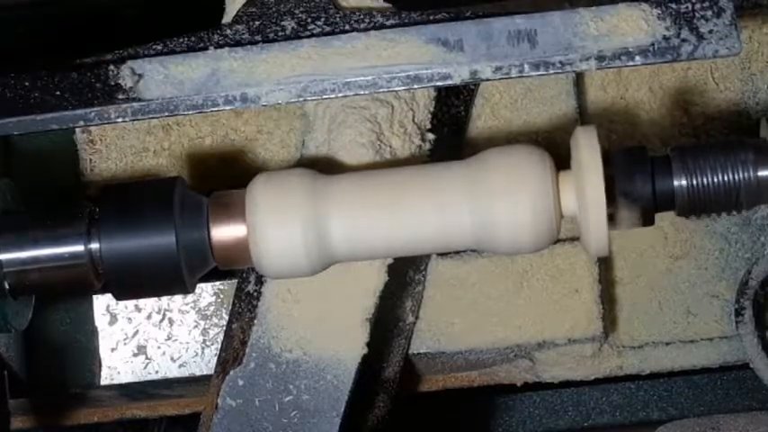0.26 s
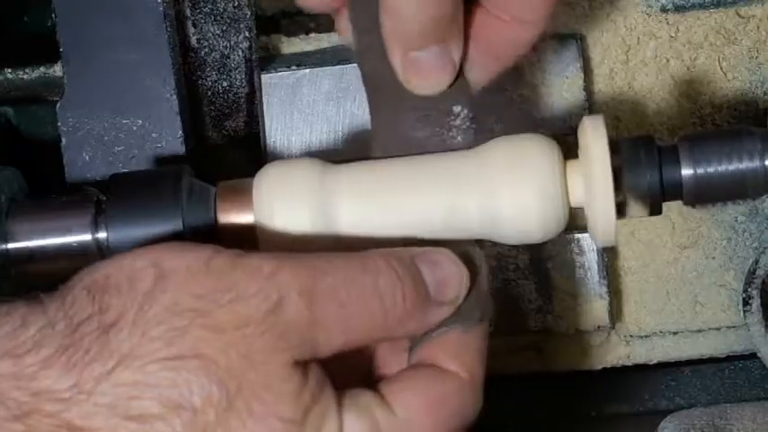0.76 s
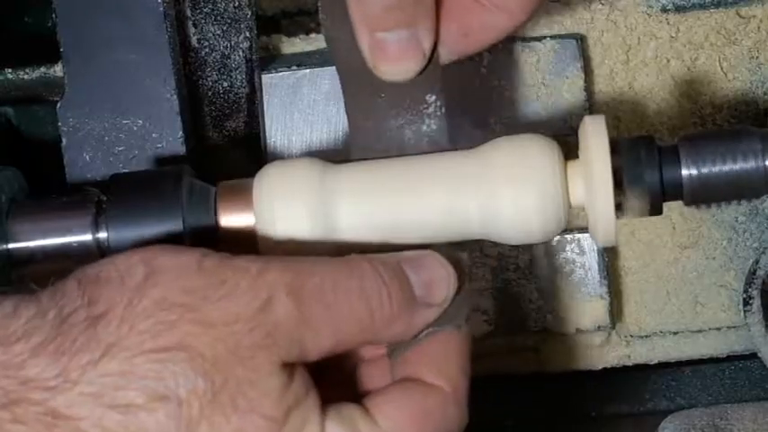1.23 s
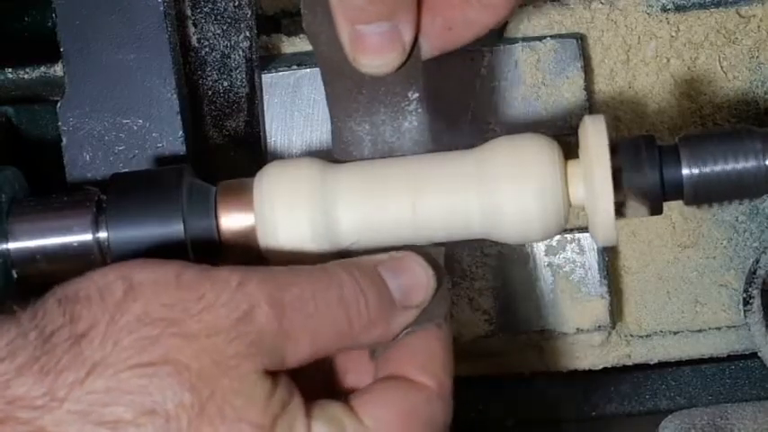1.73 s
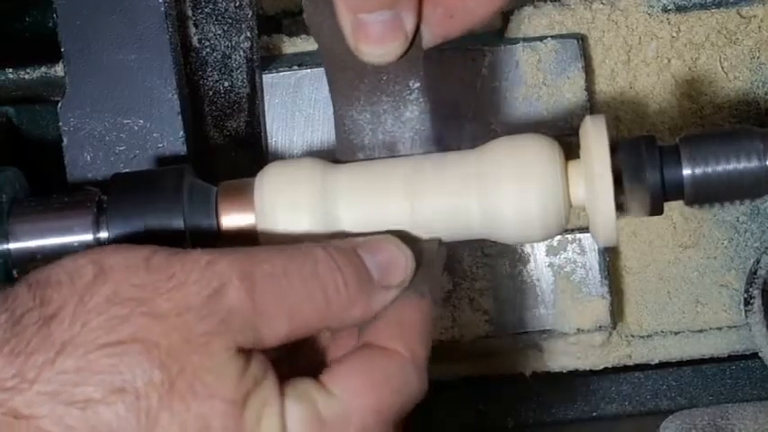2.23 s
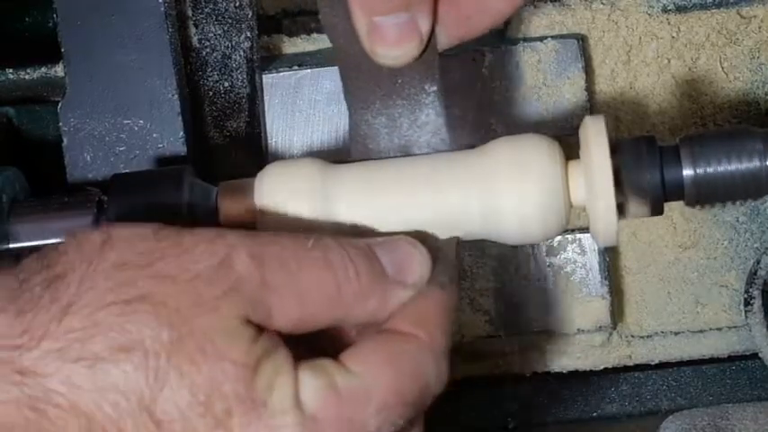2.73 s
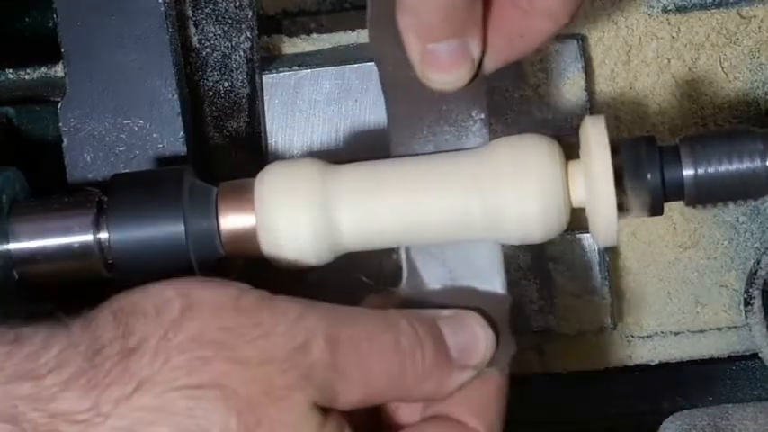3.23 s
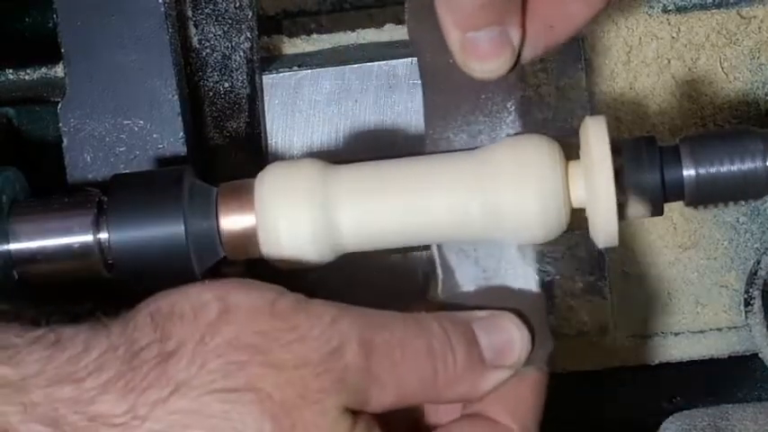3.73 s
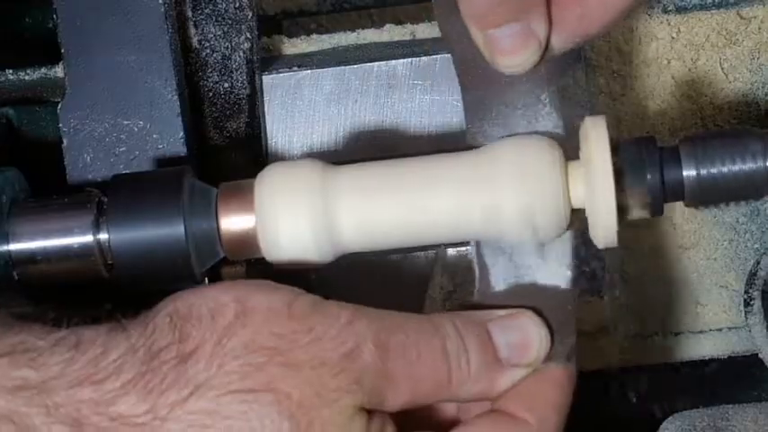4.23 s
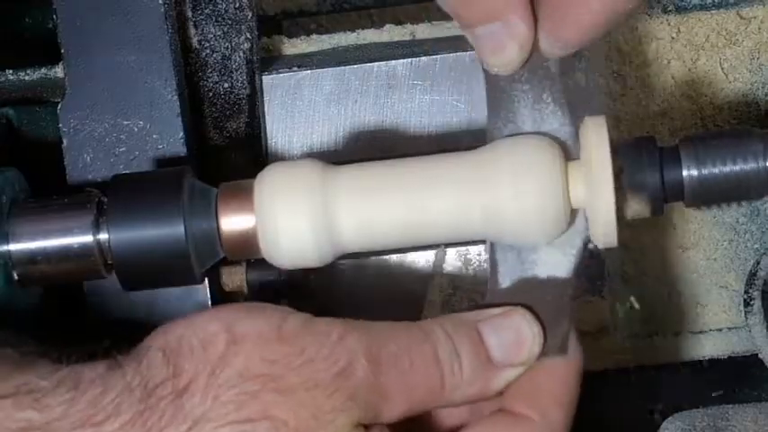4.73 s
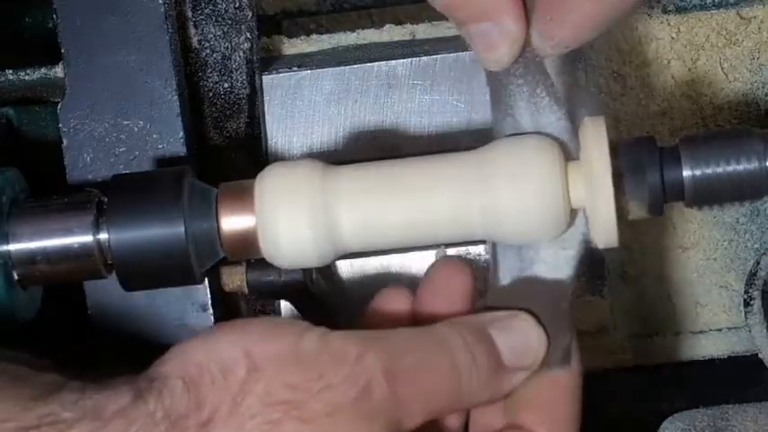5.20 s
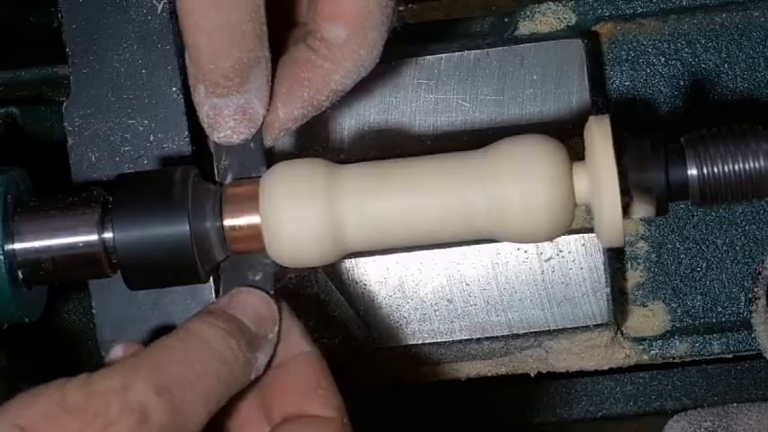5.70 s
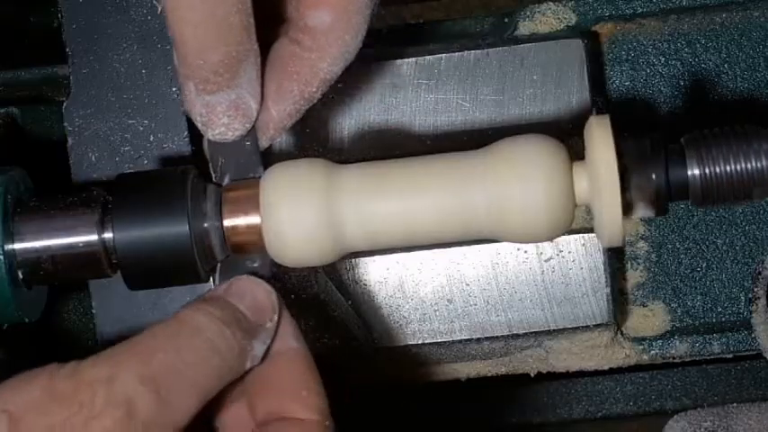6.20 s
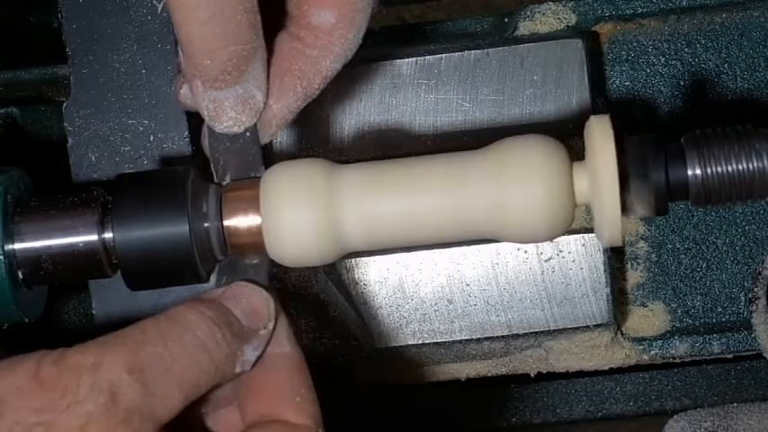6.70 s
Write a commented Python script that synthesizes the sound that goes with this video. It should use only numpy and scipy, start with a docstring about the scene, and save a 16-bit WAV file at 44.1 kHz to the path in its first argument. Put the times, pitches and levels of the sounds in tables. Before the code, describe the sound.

Very close in a workshop, a tool takes a faint, thin, ringing shaving for under half a second. A hard cut brings loud, bright sandpaper hiss on a spinning blank, firm and scrapy at first, then steadier. The small lathe hums and its bearings tick and chatter underneath. The strip rasps harsher over the shoulder, lifts off, and another cut leaves a finer strip: a short bite, then soft hiss.

```python
"""Sandpaper hisses on a blank turning in a small wood lathe close to the microphone, then rasps over its shoulder.
Three stages with hard cuts: a tool takes a faint, ringing shaving; a strip sands; a finer strip polishes the end.
Strips and tool are coloured noise with resonances, made uneven by slow random gains.
Under both sanding stages the drive drones (tones, bed noise, rumble) and the bearings chatter in bursts."""
import sys
import numpy as np
from scipy import signal
from scipy.fft import rfft, irfft, next_fast_len
from scipy.io import wavfile
from scipy.ndimage import uniform_filter1d, map_coordinates

SR = 44100
rng = np.random.default_rng(int(sys.argv[2]) if len(sys.argv) > 2 else 0)


def generate_wav(sig):
    """Save sig (samples, or channels by samples) to the path in sys.argv[1] as 16-bit PCM at SR."""
    pcm = np.round(np.clip(np.atleast_2d(sig).T, -1, 1) * 32767).astype(np.int16)
    wavfile.write(sys.argv[1], SR, pcm)


N = 306495

SANDING_START_S, POLISH_START_S = 0.4525, 5.4125
SPINDLE_HZ, MOTOR_HZ, MAINS_BUZZ_HZ = 26.27, 25.0, 100.0
TOP_HZ = 15800

# Mode tables: width = half-width at -6 dB. Colour and mode levels are relative unless noted.
# Strip pressure as rubbing level: t/s, level/dB
PRESSURE_DB = [(0.48, -10.5), (0.85, -11), (1.27, -12.5), (2.52, -12), (2.93, -15), (3.1, -13.5),
               (3.5, -12.5), (4.55, -13.5), (5.12, -13.5), (5.24, -16), (5.31, -19.5)]
HISS_DB = 0.4  # re pressure
# Coarser scrape: t/s, level re pressure/dB
SCRAPE_DB = [(1.1, -13), (2.05, -13.5), (2.25, -26), (2.65, -26), (2.9, -14), (3.6, -11), (4.5, -17),
             (5.05, -14), (5.2, -6), (5.32, -8)]
# Harder scrape at first, until the grip eases
FIRM_DB, FIRM_END_S, FIRM_RELEASE_S = -10, 1.02, 0.12
# Strip on the blank's shoulder: swelling rasp, weaker hiss
SHOULDER_START_S, SHOULDER_ATTACK_S, SHOULDER_END_S, SHOULDER_RELEASE_S = 4.55, 0.052, 5.3, 0.25
SHOULDER_DB, SHOULDER_SWELL_DB_PER_S, SHOULDER_HISS_DB = -15.5, 7, -3
SHOULDER_UNEVEN_DB = 0.9  # the rasp catches and eases
# Lift-off; only the edge still grazes
LIFT_S, LIFT_RELEASE_S, GRAZE_DB = 5.333, 0.022, -35
# Strip on the blank, hiss colour: f/Hz, level/dB
HISS_COLOUR = [(1200, -19.5), (2500, -17), (3700, -12.5), (4500, -9.5), (6000, -7.5), (8500, -4),
               (12000, 0.5), (15600, 2)]
# Scrape colour: f/Hz, level/dB
SCRAPE_COLOUR = [(1000, -13), (2400, -13), (3700, -13), (6000, -4), (7600, 4), (10500, 6.5), (12000, -17),
                 (15600, -34)]
# Paper resonances in the scrape: f/Hz, width/Hz, level/dB
SCRAPE_MODES = [(3200, 175, 0.5), (3990, 210, 0.5), (4970, 150, -5), (7400, 340, 0)]
# Shoulder rasp colour: f/Hz, level/dB
SHOULDER_COLOUR = [(1000, -21), (2700, -16), (3750, -11), (4200, -6), (4900, -6.5), (5500, -4.5),
                   (7000, -3.5), (9400, -4.5), (11000, -4.5), (15600, -14)]
# Paper resonances on the shoulder: f/Hz, width/Hz, level/dB
SHOULDER_MODES = [(3330, 230, -4.5), (4120, 160, 1.5), (4480, 190, 1), (5230, 160, 0), (5650, 230, 2),
                  (6440, 220, 0.5), (7050, 150, 1.5), (7740, 230, -1), (8240, 280, -1), (8850, 160, -7),
                  (10150, 170, 2), (11450, 200, -4), (12700, 250, -4)]
# Low flutter near the microphone while the strip rubs: f/Hz, level/dB
FLUTTER_COLOUR = [(15, 5), (50, -3), (100, -1), (170, -8), (300, 4), (1000, -43)]
# Hiss flicker: f/Hz, share of full depth
PATCHINESS = [(2000, 0.36), (2800, 0.74), (3800, 1), (5500, 0.77), (7000, 0.45), (9000, 0.34),
              (15000, 0.14)]

# Finer strip's pressure as hiss level: t/s, level/dB
POLISH_PRESSURE_DB = [(5.42, -20.5), (5.5, -24), (5.6, -22.5), (5.75, -21), (6.22, -22.5), (6.47, -21),
                      (6.62, -23), (6.94, -23)]
# Its treble, brighter towards the end: t/s, level/dB
POLISH_TREBLE_DB = [(6.3, -45), (6.48, -24), (6.62, -29), (6.88, -23), (6.95, -27)]
# Its grit bites, holds briefly, dies away
BITE_START_S, BITE_ATTACK_S, BITE_HOLD_S, BITE_DB, BITE_FADE_DB_PER_S = 5.515, 0.02, 0.17, -16.5, 90
BITE_TOUCH = 0.31  # share of the bite at first touch
# Finer strip on the collar, hiss colour: f/Hz, level/dB
POLISH_COLOUR = [(1200, -21), (2500, 1.5), (4500, 3.5), (6800, 2.5), (9500, 1), (11500, 3.5), (13300, 4.5),
                 (15600, 3)]
# Its paper resonances: f/Hz, width/Hz, level/dB
POLISH_MODES = [(2020, 120, 10.5), (4370, 370, -0.5), (6030, 200, 2.5), (7460, 110, 6), (7900, 110, 6),
                (8540, 300, 6), (10400, 300, 0)]
# Bite colour: f/Hz, level/dB
BITE_COLOUR = [(1500, -25), (3700, -9), (5000, -4), (7000, -3.5), (9000, -2), (11500, -1), (13500, -5),
               (15600, -11)]
# Paper resonances in the bite: f/Hz, width/Hz, level/dB
BITE_MODES = [(5450, 250, -5), (8200, 200, -11), (8970, 200, 1), (9380, 240, 4), (10600, 250, -3),
              (12700, 200, -6)]
# Taut strip rings: start t/s, length/s, f/Hz, width/Hz, level at full gain/dB
PAPER_RINGS = [(0.428, 0.3, 3130, 180, -33), (0.46, 0.17, 3950, 160, -31), (0.437, 0.25, 4650, 300, -32),
               (0.47, 0.08, 6550, 250, -17), (0.78, 0.22, 4030, 260, -32), (1.15, 0.95, 4720, 220, -37),
               (2.02, 0.32, 4820, 250, -28), (2.22, 0.43, 5600, 260, -28), (2.35, 0.36, 4800, 220, -32),
               (6.47, 0.16, 3300, 220, -31.5), (6.622, 0.12, 4400, 400, -34)]

SHAVING_DB = -31
# Tool's cut: f/Hz, level/dB
SHAVING_COLOUR = [(15, -48), (25, -19), (113, -18.5), (1710, -20), (2310, -20), (5170, -13), (5920, -18),
                  (6590, -14.5), (7540, -17), (8170, -12.5), (9100, -6.5), (11300, -15), (15600, -23)]
# Thin rings of the tool: f/Hz, width/Hz, level re plain cut/dB
TOOL_MODES = [(1750, 25, 6), (3520, 130, -2), (4180, 200, 2), (4660, 50, 0), (5340, 45, 4), (6670, 55, 9),
              (7960, 55, 11), (8520, 70, 8), (8790, 70, 5), (9100, 80, 6), (10040, 90, 4), (10350, 130, 3),
              (10590, 70, 7), (11180, 40, 3), (12300, 200, 2), (15340, 70, 14)]

# Running lathe: bed noise and chatter levels at t = 0, rising steadily
CHATTER_DB, CHATTER_RISE_DB_PER_S = -32, 0.69
BED_DB, BED_RISE_DB_PER_S = -30, 0.74
RUMBLE_DB = -29.5
# Bearing chatter bursts: start t/s, peak level before the burst offset/dB
CHATTER_BURSTS = [(0.4754, -12.5), (0.9278, -14.5), (1.4052, -14), (2.0547, -12), (2.585, -12.5),
                  (3.1951, -17), (3.2365, -16), (3.5189, -15), (3.6246, -16), (4.364, -6), (4.3794, -17),
                  (4.7391, -19), (4.974, -20), (5.0139, -16), (5.286, -12), (5.485, -15.5), (5.6236, -10),
                  (5.775, -15), (5.8132, -18), (6.033, -13), (6.173, -15), (6.2147, -18), (6.3137, -15),
                  (6.6832, -18), (6.8527, -15)]
# Bearing housing resonances: f/Hz, width/Hz, level/dB
HOUSING_MODES = [(1150, 22, -7.5), (1300, 14, -7.5), (1438, 25, -6), (1541, 30, -3.5), (1574, 15, -1.5),
                 (1645, 16, 2), (1690, 44, -8.5), (1830, 55, -5), (1946, 50, 3), (2017, 110, -1.5),
                 (2380, 160, -9), (2660, 45, -7.5), (3090, 40, -8)]
# Motor, belt and spindle tones: f/Hz, rms level/dB
DRIVE_TONES = [(64.9, -54), (121.8, -58), (124.8, -59), (129.9, -58), (173.9, -53), (200.2, -49.5),
               (224.8, -56), (239.6, -55), (249.3, -52), (274.5, -55), (296.1, -40), (315.4, -30.8),
               (326, -42), (328, -42), (337.1, -35), (358.7, -41.5), (394, -45), (519.2, -48), (662.1, -55),
               (840.5, -49), (979.8, -51), (990.5, -49), (1641.6, -44)]
WHINE_HZ = 740.2
# Motor overtone, swelling and sinking: t/s, rms level/dB
WHINE_DB = [(1.3, -47), (1.85, -35.5), (2.0, -47), (3.7, -41), (4.7, -45), (5.5, -36), (5.7, -42.5),
            (6.9, -37.5)]
# Bed and headstock resonances: f/Hz, width/Hz, level/dB
BED_MODES = [(310, 5, -2.5), (326.7, 5.4, 3.5), (343.3, 11, 4), (353, 6.3, -3), (378, 5.6, -2),
             (394, 14.2, -1.5), (419, 20, -9.5), (458.5, 13, -6), (520.4, 7, -7), (580.5, 16, -7),
             (761, 20, -8), (790, 20, -8.5), (855, 24, -8.5), (986, 18.6, -8)]
# Broad machine rumble: f/Hz, level/dB
RUMBLE_COLOUR = [(20, -21), (45, -26), (70, -7), (100, -10.5), (170, -0.5), (260, 6.5), (500, -0.5),
                 (700, 1.5), (1200, 1.5), (2250, 2.5), (2600, 3), (3000, -0.5), (4000, -4.5), (7000, -12),
                 (15000, -36)]

# Stereo width, applied to all side sound: f/Hz, side gain/dB
WIDTH = [(30, 3), (65, -8), (130, -7.5), (320, -10), (550, -5), (1000, -6), (1800, -5.5), (2400, -2),
         (3000, -8), (3800, -7.5), (5500, -8), (8000, -8.5), (13000, -5.5)]
# Stereo lean: f/Hz, left minus right gain/dB
LEAN = [(60, 1), (110, 5.5), (200, 0.5), (380, 1.5), (700, 0.5), (1290, 2), (2380, -0.5), (4400, -0.5),
        (8120, 0.5), (15000, 3)]

TIME = np.arange(N) / SR
FFT_SIZE = next_fast_len(N, True)
FREQS = np.maximum(np.fft.rfftfreq(FFT_SIZE, 1 / SR), 1)


def sanding(flutter_db=-51, shoulder_flutter_db=-2):
    """The strip scrapes firmly, hisses along the blank, then rasps over its shoulder and lifts off."""
    pressure = amp(curve(PRESSURE_DB)) * release(LIFT_S, LIFT_RELEASE_S)
    on_shoulder = attack(SHOULDER_START_S, SHOULDER_ATTACK_S)
    hiss = pressure * amp(HISS_DB + SHOULDER_HISS_DB * on_shoulder)
    firm = amp(FIRM_DB) * release(FIRM_END_S, FIRM_RELEASE_S)
    scrape = pressure * (amp(curve(SCRAPE_DB)) + firm)

    swell_db = SHOULDER_SWELL_DB_PER_S * (TIME - SHOULDER_START_S)
    dig = amp(SHOULDER_DB + swell_db + SHOULDER_UNEVEN_DB * walk(16))
    rasp = on_shoulder * (dig * release(SHOULDER_END_S, SHOULDER_RELEASE_S) + amp(GRAZE_DB))

    along = hiss * rub(HISS_COLOUR) + scrape * rub(SCRAPE_COLOUR, SCRAPE_MODES, drift=.012)
    along = patchy(along, depth_db=3.6, rate_hz=26, width_hz=110)
    over = rasp * rub(SHOULDER_COLOUR, SHOULDER_MODES)
    over = patchy(over, depth_db=1.5, rate_hz=26, width_hz=170)

    effort = unit(hiss + amp(shoulder_flutter_db) * rasp)
    flutter = amp(flutter_db) * effort * unit(filtered(noise(), colour(FLUTTER_COLOUR)))
    return along + leftward(over, share=.15) + flutter


def polishing(side_db=4.0):
    """The finer strip touches, bites, then settles to a soft, wide hiss."""
    fading_s = np.maximum(TIME - BITE_START_S - BITE_HOLD_S, 0)
    grip = BITE_TOUCH + (1 - BITE_TOUCH) * attack(BITE_START_S, BITE_ATTACK_S)
    bite = grip * amp(BITE_DB - BITE_FADE_DB_PER_S * fading_s)
    hiss = amp(curve(POLISH_PRESSURE_DB))
    paper = hiss * rub(POLISH_COLOUR, POLISH_MODES, grain_db=1.0, runout_db=0.66)
    paper = paper + bite * rub(BITE_COLOUR, BITE_MODES)
    paper = paper + amp(curve(POLISH_TREBLE_DB)) * rub(HISS_COLOUR, runout_db=1.0)
    return spread(patchy(paper, depth_db=2.1, rate_hz=22, width_hz=150), side_db)


def rub(points, modes=(), grain_db=0.56, runout_db=0.3, flicker_db=0.5, shift_db=1.3, drift=0.003):
    """Countless grits scratch the wood, harder once a turn; paper resonances drift, come and go with the grip."""
    contact_db = grain_db * walk(2500) + flicker_db * walk(25.06)
    contact_db = contact_db + runout_db * once_a_cycle(SPINDLE_HZ, 5.6)
    scratch = filtered(noise(), colour(points) * (FREQS < TOP_HZ))
    if len(modes):
        ringing = wander(filtered(noise(), resonances(modes)), drift, rate_hz=7)
        scratch = scratch + ringing * amp(shift_db * walk(8))
    return unit(scratch) * amp(contact_db)


def paper_rings(edge_s=0.058):
    """Pulled taut, the strip rings for a moment at a pitch set by its free length: narrow noise bands."""
    total = 0
    for start_s, length_s, hz, width_hz, db in PAPER_RINGS:
        gain = amp(db) * attack(start_s, edge_s) * release(start_s + length_s, edge_s)
        total = total + gain * unit(filtered(noise(), resonances([(hz, width_hz, 0)])))
    return total


def shaving():
    """The tool peels fine dust off the blank, and the steel rings thinly."""
    cut = noise() * amp(1.3 * walk(62.3))
    response = colour(SHAVING_COLOUR) * np.hypot(1, resonances(TOOL_MODES))
    return amp(SHAVING_DB) * unit(filtered(cut, response))


def bearings(uneven_db=1.8, turn_db=1.5, buzz_db=1.4, burst_offset_db=-7, burst_s=0.0025, side_db=-10):
    """Bearing play chatters with motor turn and torque ripple, at times in hard bursts, ringing the housing."""
    force_db = uneven_db * walk(180)
    force_db = force_db + turn_db * once_a_cycle(MOTOR_HZ, 2.2)
    force_db = force_db + buzz_db * once_a_cycle(MAINS_BUZZ_HZ, 0.92)
    force = unit(amp(force_db)) * amp(CHATTER_DB + CHATTER_RISE_DB_PER_S * TIME)
    for start_s, db in CHATTER_BURSTS:
        age = np.clip((TIME - start_s) / burst_s, 0, 20)
        force = force + amp(db + burst_offset_db) * age * np.exp(1 - age)  # peaks at age 1
    return spread(filtered(noise() * force, unit(resonances(HOUSING_MODES))), side_db)


def drive(waver=0.000584, flutter_db=0.7, side_db=-12):
    """Rotating parts hum at a slightly wavering speed; rolling noise rings the bed and rumbles round the room."""
    turning_s = TIME + np.cumsum(waver * walk(3.02)) / SR
    tones = amp(curve(WHINE_DB)) * np.exp(2j * np.pi * WHINE_HZ * turning_s)
    for hz, db in DRIVE_TONES:
        cycles = hz * turning_s + rng.random()
        tones = tones + amp(db + flutter_db * walk(6)) * np.exp(2j * np.pi * cycles)
    # sides a quarter cycle late; sqrt(2) turns rms into peak
    tones = np.sqrt(2) * np.array([tones.real, tones.imag])
    bed = unit(filtered(noise(), resonances(BED_MODES)))
    rumble = unit(filtered(noise() * amp(0.98 * walk(120)), colour(RUMBLE_COLOUR)))
    drone = tones + amp(BED_DB + BED_RISE_DB_PER_S * TIME) * bed
    return spread(drone, side_db) + amp(RUMBLE_DB) * rumble


def scatter(sound, echo_db=-19, decay_s=0.015):
    """Bed, headstock and hands return a cluster of early echoes that ripples the hiss."""
    lag_s = TIME[:SR // 40]
    echoes = rng.standard_normal((2, len(lag_s))) * np.exp(-lag_s / decay_s) * (lag_s > .0008)
    echoes = amp(echo_db) * echoes / np.linalg.norm(echoes, axis=1, keepdims=True)
    returned = signal.fftconvolve(sound, echoes, axes=1)[:, :N]
    return (sound + returned) / np.hypot(1, amp(echo_db))


def spread(sound, side_db):
    """Set the side share: low for direct machine sound, high for scattered sound."""
    return sound * np.array([[1], [amp(side_db)]])


def leftward(sound, share):
    """A source left of centre puts some of its front sound into the side."""
    return np.array([sound[0], sound[1] + share * sound[0]])


def microphone(sound):
    """Front plus/minus side gives left/right, with frequency-dependent width and lean."""
    mid, side = sound[0], filtered(sound[1], colour(WIDTH))
    lean = np.sqrt(colour(LEAN))
    return np.array([filtered(mid + side, lean), filtered(mid - side, 1 / lean)])


def patchy(x, depth_db, rate_hz, width_hz):
    """Roughen a hiss: narrow bands swell and sink on their own, rate_hz times a second."""
    hz, t_s, frames = signal.stft(x, SR, nperseg=512)
    chance = rng.standard_normal((256, 512))
    place = np.meshgrid(hz / width_hz, t_s * rate_hz, indexing="ij")
    field = unit(map_coordinates(chance, place, order=1, mode="mirror"))
    share = np.interp(hz, *np.transpose(PATCHINESS))[:, None]
    gain = amp(depth_db * share * field)
    gain = gain / np.sqrt(np.mean(gain ** 2, axis=1, keepdims=True))
    return signal.istft(frames * gain, SR)[1][..., :N]


def wander(x, share, rate_hz):
    """Let all resonances drift together by an rms share of their pitch, via a varying read position."""
    place = np.arange(N) + np.cumsum(share * walk(rate_hz))
    return np.array([map_coordinates(channel, [place], order=3, mode="mirror") for channel in x])


def noise():
    """Two unrelated white noises: front and sides."""
    return rng.standard_normal((2, N))


def walk(rate_hz):
    """Slow chance, rms 1: random levels held 1 / rate_hz and smoothed twice."""
    hold = int(SR / rate_hz)
    steps = np.repeat(rng.standard_normal(N // hold + 1), hold)
    return unit(uniform_filter1d(uniform_filter1d(steps, hold), hold)[:N])


def once_a_cycle(hz, sharpness):
    """A bump each cycle, mean 0, rms 1."""
    bump = np.exp(sharpness * np.cos(2 * np.pi * hz * TIME))
    return unit(bump - bump.mean())


def colour(points):
    """Gain at every frequency from (f/Hz, level/dB), linear in dB over log frequency."""
    hz, db = np.transpose(points)
    return amp(np.interp(np.log(FREQS), np.log(hz), db))


def resonances(modes):
    """Gain of steep-skirted modes (f/Hz, width/Hz, level/dB), powers added."""
    power = 0
    for hz, width_hz, db in modes:
        power = power + (amp(db) / (1 + ((FREQS - hz) / width_hz) ** 2)) ** 2
    return np.sqrt(power)


def filtered(x, gain):
    """Apply a frequency response."""
    return irfft(rfft(x, FFT_SIZE) * gain, FFT_SIZE)[..., :N]


def amp(db):
    """Decibels to gain."""
    return 10 ** (np.asarray(db) / 20)


def unit(x):
    """Scale to rms 1."""
    return x / np.sqrt(np.mean(x ** 2))


def curve(rows):
    """Interpolate (t/s, value) at every sample."""
    return np.interp(TIME, *np.transpose(rows))


def attack(start_s, length_s):
    """Gain rising 0 to 1 from start_s."""
    return np.clip((TIME - start_s) / length_s, 0, 1)


def release(end_s, length_s):
    """Gain falling 1 to 0, ending at end_s."""
    return np.clip((end_s - TIME) / length_s, 0, 1)


def stage(start_s, end_s):
    """1 inside a stage, 0 outside, edges smoothed over 24 samples."""
    return uniform_filter1d(1. * ((TIME >= start_s) & (TIME < end_s)), size=24)


def scene():
    """Shaving, sanding and polishing in turn; the last is further to the left."""
    lathe = drive() + bearings()
    rings = paper_rings()
    coarse = lathe + leftward(scatter(sanding() + rings), share=.03)
    fine = leftward(lathe, share=.08) + leftward(scatter(polishing() + rings), share=0.3)
    sound = shaving() * stage(0, SANDING_START_S)
    sound = sound + coarse * stage(SANDING_START_S, POLISH_START_S)
    sound = sound + fine * stage(POLISH_START_S, np.inf)
    return microphone(sound)


def record(dry):
    """Clip at full scale, then cut steeply above TOP_HZ."""
    lowpass = signal.ellip(12, .1, 60, TOP_HZ, fs=SR, output="sos")
    return signal.sosfilt(lowpass, np.clip(dry, -1, 1))


dry = scene()
out = record(dry)
generate_wav(out)
```